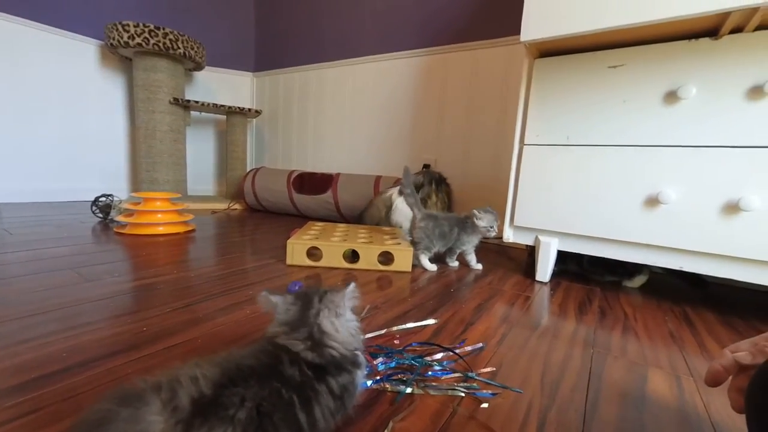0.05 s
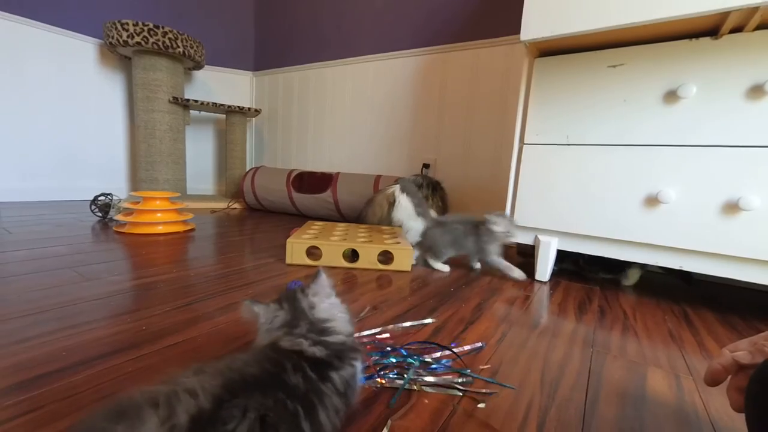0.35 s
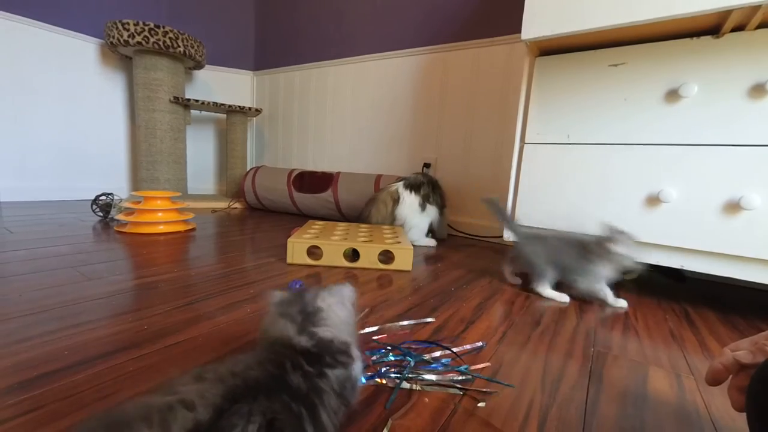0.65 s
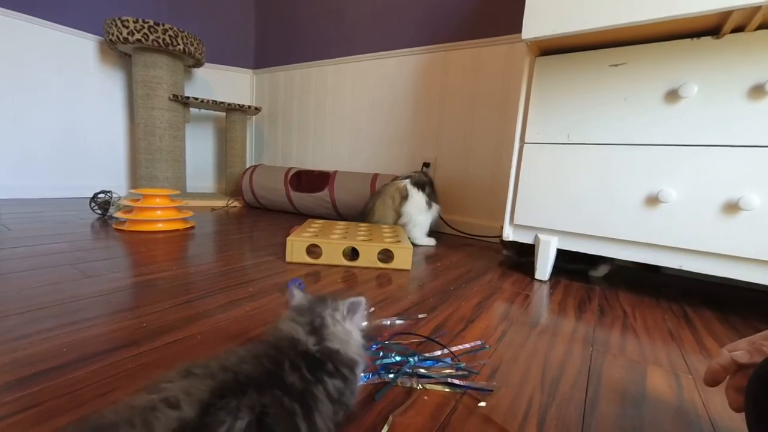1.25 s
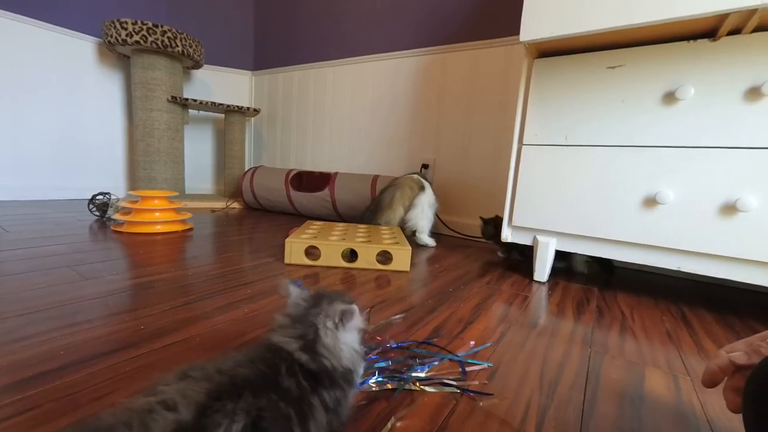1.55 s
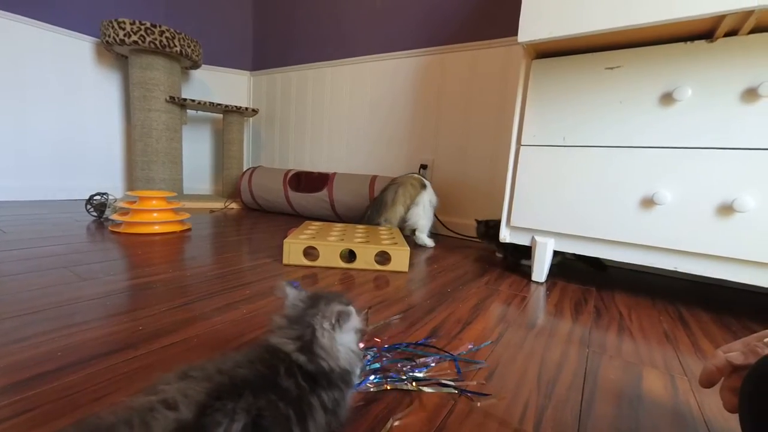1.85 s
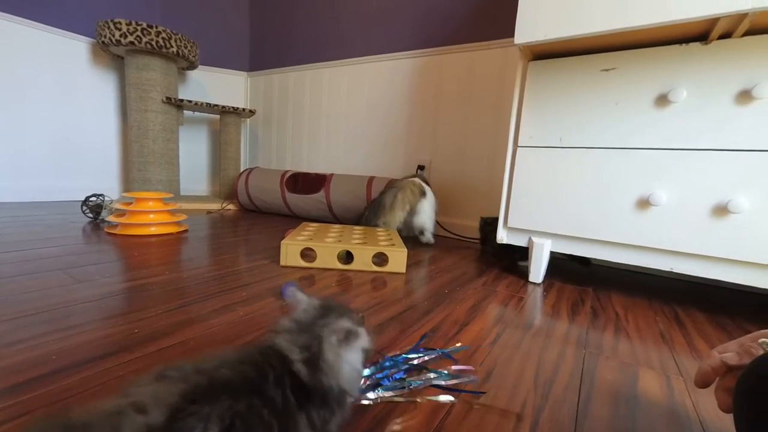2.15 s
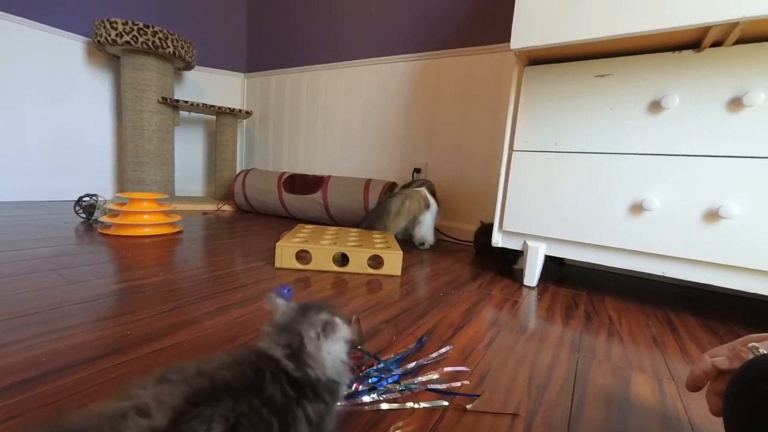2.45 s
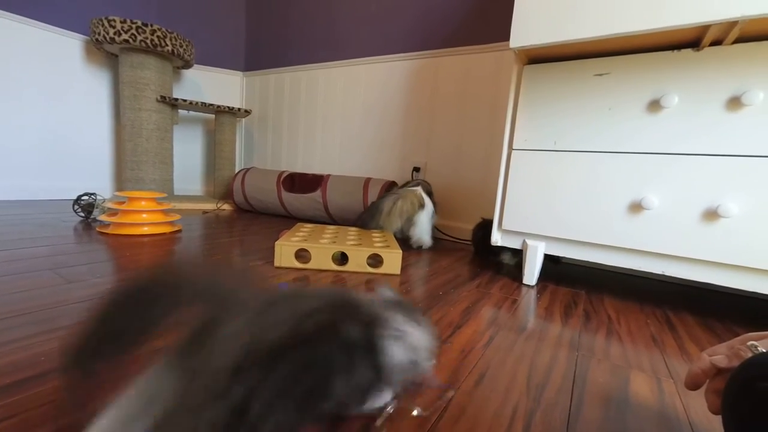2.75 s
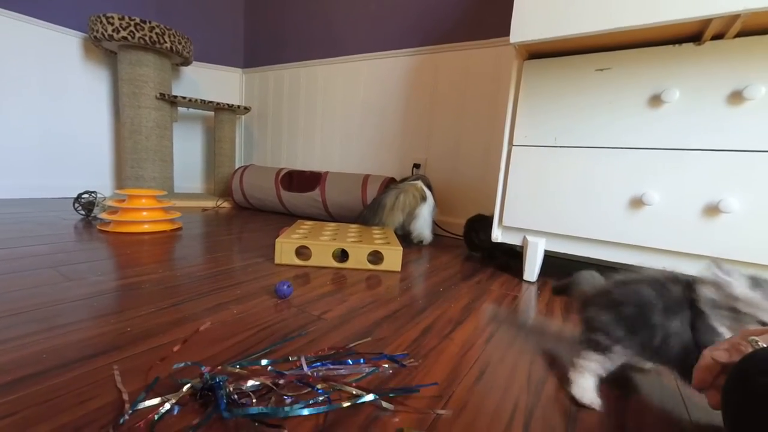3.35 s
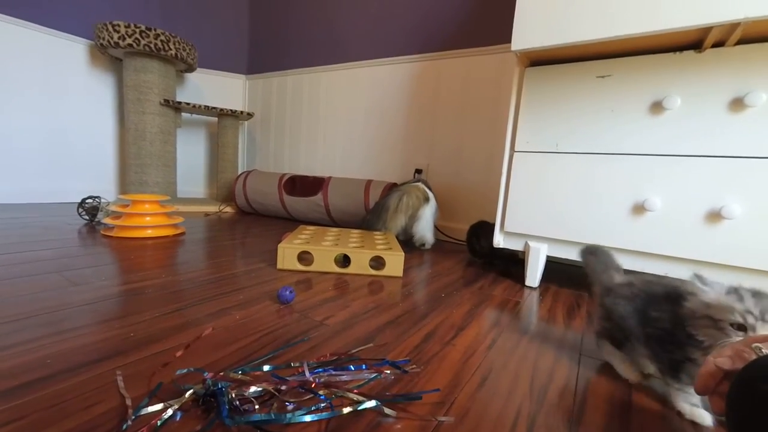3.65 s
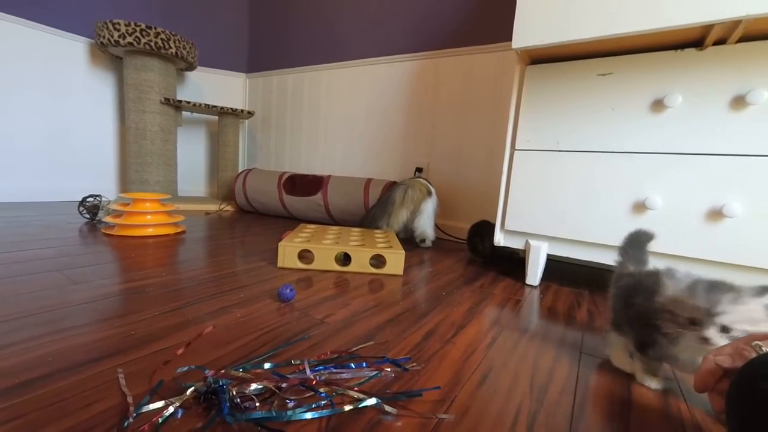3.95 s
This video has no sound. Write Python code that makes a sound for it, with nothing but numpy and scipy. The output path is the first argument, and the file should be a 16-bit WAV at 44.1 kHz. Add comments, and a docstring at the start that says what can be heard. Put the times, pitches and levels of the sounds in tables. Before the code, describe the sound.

Soft crinkling of a foil cat toy, with light paw taps in a quietly humming room.

```python
"""Kittens and a tinsel teaser

A quiet, bare room with a dull rush of air and a steadily humming appliance.
Tinsel is swished over the wooden floor in short strokes; its foil strips crinkle, scrape and snap.
A kitten pounces through it: claws tick on the varnish, paws set a floorboard ringing."""
import sys
import numpy as np
from scipy import signal
from scipy.fft import rfft, irfft, next_fast_len
from scipy.io import wavfile
from scipy.ndimage import map_coordinates

SR = 44100
rng = np.random.default_rng(int(sys.argv[2]) if len(sys.argv) > 2 else 0)


def materialize(psi):
    """Save the field psi as 16-bit PCM at rate SR to the path in sys.argv[1].

    A 1-D psi becomes a single channel; in a 2-D psi each row is a channel.
    """
    bounded = np.clip(np.atleast_2d(psi).T, -1, 1)
    quanta = np.round(bounded * 32767).astype(np.int16)
    wavfile.write(sys.argv[1], SR, quanta)


N = 176400
CREASE_SPREAD_DB, HIT_WET_DB = 4, -10.5


def amp(db):
    """Decibels to gain."""
    return 10 ** (np.asarray(db) / 20)


def unit(x):
    """Scale to rms 1."""
    return x / np.sqrt(np.mean(x ** 2) + 1e-20)


def decay(t, t60_s):
    """Exponential fall, 60 dB in t60_s."""
    return np.exp(-np.log(1000) * t / t60_s)


def along(points, hz):
    """Interpolate (Hz, value) points on a log frequency axis."""
    points_hz, values = np.transpose(points)
    return np.interp(np.log(hz + 1), np.log(points_hz + 1), values)


def filtered(x, response):
    """Filter x by the gain response(hz)."""
    n = x.shape[-1]
    n_fft = next_fast_len(n + SR // 10)
    hz = np.fft.rfftfreq(n_fft, 1 / SR)
    return irfft(rfft(x, n_fft) * response(hz), n_fft)[..., :n]


def wobble(knots_per_s):
    """Smooth random curve, N samples."""
    return map_coordinates(rng.standard_normal(256), [np.arange(N) * knots_per_s / SR], mode="wrap")


def add(track, start_s, sound):
    """Mix a sound into the track."""
    part = track[max(round(start_s * SR), 0):][:len(sound)]
    part += sound[:len(part)]


def in_room(x, wet_db):
    """Add a diffuse tail; each frequency dies at its own speed."""
    # room decay: (frequency [Hz], t60 [s])
    reverb_times = [(200, 0.35), (2000, 0.53), (7000, 0.63), (15000, 0.22)]
    hz, t, noise = signal.stft(rng.standard_normal(SR // 2), SR, nperseg=256)
    tail = signal.istft(noise * decay(t, along(reverb_times, hz)[:, None]), SR)[1]
    response = amp(wet_db) * tail / np.linalg.norm(tail)
    response[0] += 1  # direct sound
    return signal.fftconvolve(x, response)


def air(level_db=-45.5, side_db=-50):
    """Dull rush of the room, nearly mono."""
    # rush spectrum: (frequency [Hz], relative density [dB])
    spectrum = [(5, -6.5), (20, 11.5), (35, -4.5), (55, -2), (75, -6), (100, -1), (140, 3), (180, -5),
                (225, -1.5), (280, -5), (345, -6), (400, -9.5), (510, -6), (760, -14), (1100, -18),
                (1800, -22.5), (2800, -25), (4000, -31.5), (7000, -37.5), (10000, -45.5), (15000, -49)]
    mid, side = unit(filtered(rng.standard_normal((2, N)), lambda hz: amp(along(spectrum, hz))))
    side = amp(side_db) * side
    return amp(level_db) * np.array([mid + side, mid - side])


def appliance(hum_hz=122.0, hum_waver_rad=0.021, motor_waver_rad=1, waver_db=0.5, waver_per_s=4.986):
    """Steady harmonic hum plus a few less steady motor tones."""
    # hum harmonics: (multiple of hum_hz, rms level [dB])
    harmonics = [(1, -42), (2, -54), (3, -70), (4, -62.5), (5, -67.5), (6, -68), (7, -71.5), (9, -76)]
    # motor tones: (frequency [Hz], rms level [dB])
    motor = [(139.6, -56), (216, -59), (221.5, -57.5), (518, -66), (561, -71), (657, -72)]
    tones = [(k * hum_hz, db, hum_waver_rad) for k, db in harmonics]
    tones += [(hz, db, motor_waver_rad) for hz, db in motor]
    out, t = np.zeros(N), np.arange(N) / SR
    for hz, db, waver_rad in tones:
        peak = np.sqrt(2) * amp(db + waver_db * wobble(waver_per_s))
        phase = 2 * np.pi * (hz * t + rng.random()) + waver_rad * wobble(waver_per_s)
        out += peak * np.sin(phase)
    return out


def crinkles(n, per_s=6000):
    """Dense hail of tiny impulses of uneven size."""
    chance, size, sign = rng.random(n), rng.standard_normal(n), rng.choice([-1, 1], n)
    return (chance < per_s / SR) * sign * amp(CREASE_SPREAD_DB * np.clip(size, -2, 2))


def crackles(n, per_s=80, t60_s=0.0048):
    """Larger creases pop sparsely, each a very short noise burst."""
    pops = (rng.random(n) < per_s / SR) * amp(CREASE_SPREAD_DB * rng.uniform(-0.75, 1, n))
    envelope = signal.lfilter([1], [1, -decay(1 / SR, t60_s)], pops)
    return unit(envelope * rng.standard_normal(n))


def tinsel(release_s=0.076, jerk_db=1.1, jerks_per_s=34.4, crackle_db=-13.5, pivot_hz=6500):
    """Each stroke crinkles the foil and scrapes it over the boards, then the strips settle."""
    # strokes: (start [s], rise [s], hold [s], level [dB], foil tilt [dB/octave], scrape re foil [dB])
    strokes = [(0.226, 0.048, .04, -72.5, 2, -12), (0.315, .01, 0.037, -66, 0, -9),
               (0.674, 0.0039, 0.022, -63.5, 1, 2), (0.757, 0.038, 0.1, -65.5, -2.5, 3.5),
               (0.906, 0.029, 0.11, -62, 0, 0.5), (1.028, 0.013, 0.044, -58, 5.5, -6),
               (1.208, 0.0092, 0.023, -64.5, 0, -3), (1.332, .02, 0.017, -65, 0, -4),
               (1.363, 0.015, 0.075, -57, 1, -11), (1.451, 0.03, 0.013, -52.5, -2.5, 3.5),
               (1.602, 0.014, 0.026, -59.5, -7, 0), (1.715, .005, 0.016, -66, -.5, -18),
               (1.936, 0.042, 0.11, -65.5, -0.5, -2), (2.059, 0.027, 0.035, -59.5, -0.5, -17),
               (2.181, 0.014, 0.053, -60, -4, -0.5), (2.297, .02, 0.32, -69, -1.5, -14),
               (2.555, 0.0084, 0.034, -61, -1.5, 0), (2.654, 0.024, 0.039, -51.5, 0, -5),
               (2.726, 0.0065, 0.052, -48.5, 0.5, -3), (2.832, 0.017, 0.037, -56.5, 3, -12),
               (2.905, 0.0024, 0.011, -51, 0.5, -2), (2.95, 0.016, 0.066, -55.5, 0, -21),
               (3.082, 0.038, 0.11, -64.5, 0.5, -1), (3.416, 0.085, 0.15, -66, -3.5, -4),
               (3.653, 0.018, 0.024, -64.5, 2, 7.5), (3.852, .04, .03, -68, -3, -2),
               (3.923, .006, 0.065, -60.5, 0.5, 6)]
    # foil crinkle: (frequency [Hz], relative density [dB])
    foil_spectrum = [(600, -37), (1500, -14), (2800, -1.5), (4200, 1), (5500, 1), (7200, 1.7), (9000, -1.5),
                     (11000, -4.5), (15000, -7.5)]
    # scrape on the boards: (frequency [Hz], relative density [dB])
    scrape_spectrum = [(100, 2), (350, 6.5), (700, 5), (1200, 1.5), (2000, -5), (3200, -9), (6000, -15),
                       (15000, -51)]
    n = SR // 2
    out, t = np.zeros(N), np.arange(n) / SR
    for start_s, rise_s, hold_s, db, tilt_db_oct, scrape_db in strokes:
        motion = np.minimum(t / rise_s, 1) * np.exp(-np.maximum(t - rise_s - hold_s, 0) / release_s)
        motion *= amp(jerk_db * wobble(jerks_per_s)[:n])  # strips catch and slip
        creases = unit(crinkles(n)) + amp(crackle_db) * crackles(n)
        foil_gain = lambda hz: amp(along(foil_spectrum, hz) + tilt_db_oct * np.log2((hz + 1) / pivot_hz))
        foil = unit(filtered(creases, foil_gain))
        scrape = unit(filtered(crinkles(n), lambda hz: amp(along(scrape_spectrum, hz))))
        rustle = amp(db) * motion * (foil + amp(scrape_db) * scrape)
        add(out, start_s, in_room(rustle, wet_db=-5))
    return out


def contact(centre_hz, width_oct, t60_s):
    """Short, dead ring: a decaying band of noise."""
    t = np.arange(SR // 10) / SR
    band = lambda hz: np.exp(-.5 * (np.log2((hz + 1) / centre_hz) / width_oct) ** 2)
    ring = unit(filtered(rng.standard_normal(len(t)), band))
    return .5 * ring * decay(t, t60_s)


def foil_snaps():
    """Single strips flick over and snap."""
    # snaps: (time [s], level [dB], centre [Hz])
    snaps = [(0.332, -47, 6000), (.626, -55, 7000), (.681, -41.5, 4740), (.798, -51, 6500),
             (1.2156, -50, 6000), (1.37, -48, 5000), (1.3823, -45, 7100), (1.463, -41, 7000),
             (1.623, -44, 5000), (1.719, -43.5, 6150), (2.023, -48, 6500), (2.1106, -48, 7800),
             (2.191, -44, 6960), (2.323, -50, 8000), (2.583, -48, 6000), (2.6753, -48, 4500),
             (2.6858, -44, 4500), (2.735, -42, 7300), (2.742, -35, 4950), (2.792, -39, 5600),
             (2.909, -34.5, 5670), (2.9136, -38, 6500), (2.964, -44, 12000), (3.132, -51, 5800),
             (3.67, -49.5, 6500), (3.926, -42, 5500)]
    out = np.zeros(N)
    for start_s, db, centre_hz in snaps:
        snap = contact(centre_hz, width_oct=0.39, t60_s=0.0097)
        add(out, start_s, in_room(amp(db) * snap, HIT_WET_DB))
    return out


def paw_knocks():
    """Landing paws briefly ring a floorboard."""
    # landings: (time [s], level [dB])
    landings = [(2.7415, -31.5), (2.7614, -41), (3.927, -45)]
    # floorboard modes: (frequency [Hz], relative level [dB], t60 [s])
    modes = [(450, -11.5, 0.053), (634, -11, 0.038), (850, -7, 0.02), (1120, 0, 0.019), (1560, -8, 0.0043),
             (3740, -8, 0.011)]
    out, t = np.zeros(N), np.arange(SR // 10) / SR
    knock = sum(amp(db) * np.sin(2 * np.pi * hz * t) * decay(t, t60_s) for hz, db, t60_s in modes)
    for start_s, db in landings:
        add(out, start_s, in_room(amp(db) * knock, HIT_WET_DB))
    return out


def claw_taps():
    """Claws tick on the varnish."""
    # taps: (time [s], level [dB], centre [Hz], width [octaves], t60 [s])
    taps = [(2.909, -34.5, 2800, 0.8, 0.022), (3.1927, -38, 2650, 0.52, 0.015),
            (3.944, -45.5, 1550, 0.49, 0.08)]
    out = np.zeros(N)
    for start_s, db, centre_hz, width_oct, t60_s in taps:
        add(out, start_s, in_room(amp(db) * contact(centre_hz, width_oct, t60_s), HIT_WET_DB))
    return out


def scene():
    """Hum and play, centred in the room's rush."""
    return air() + appliance() + tinsel() + foil_snaps() + paw_knocks() + claw_taps()


def record(dry):
    """Brick-wall low-pass."""
    return filtered(dry, lambda hz: hz < 15250)


dry = scene()
out = record(dry)
materialize(out)
```